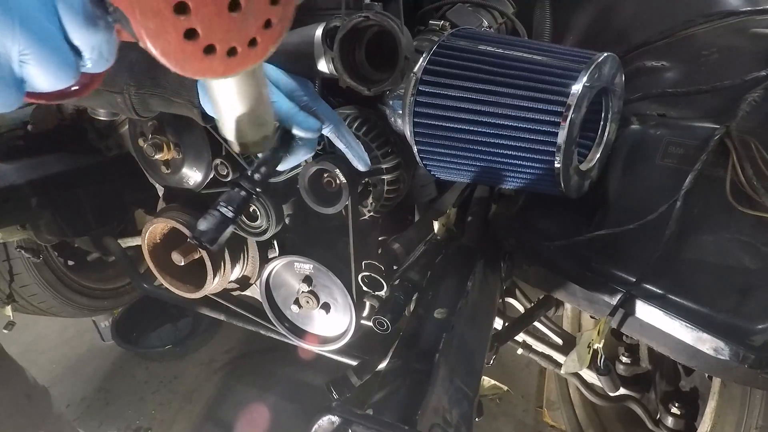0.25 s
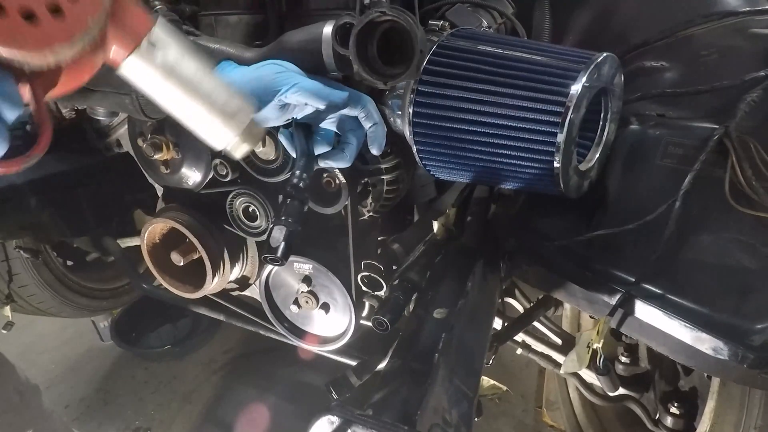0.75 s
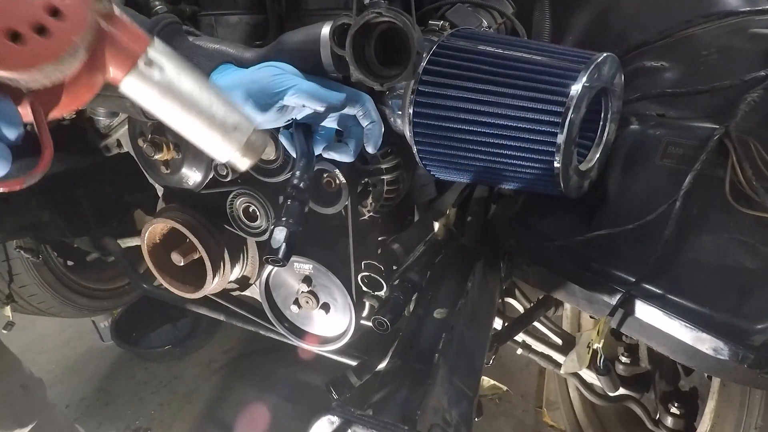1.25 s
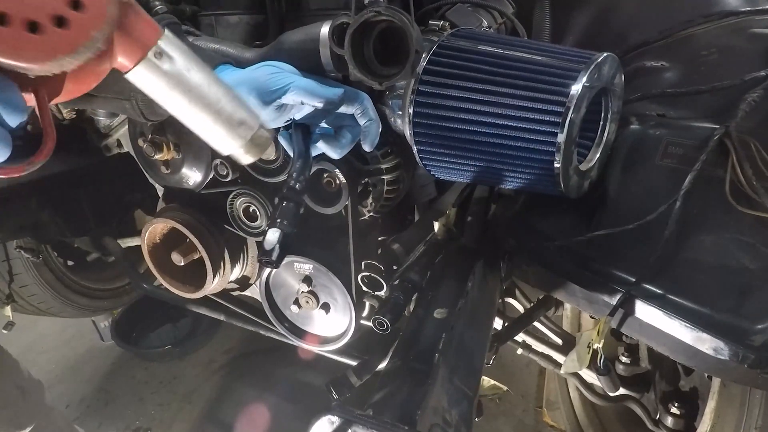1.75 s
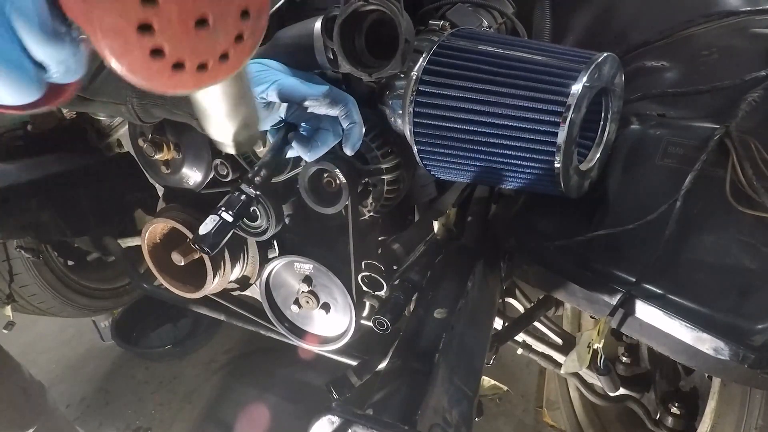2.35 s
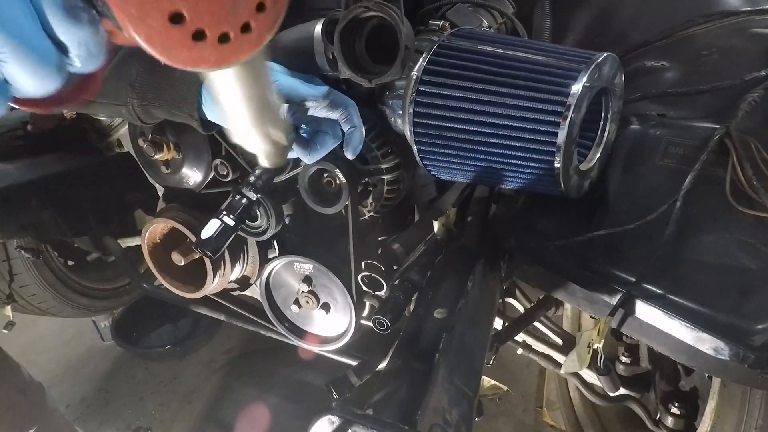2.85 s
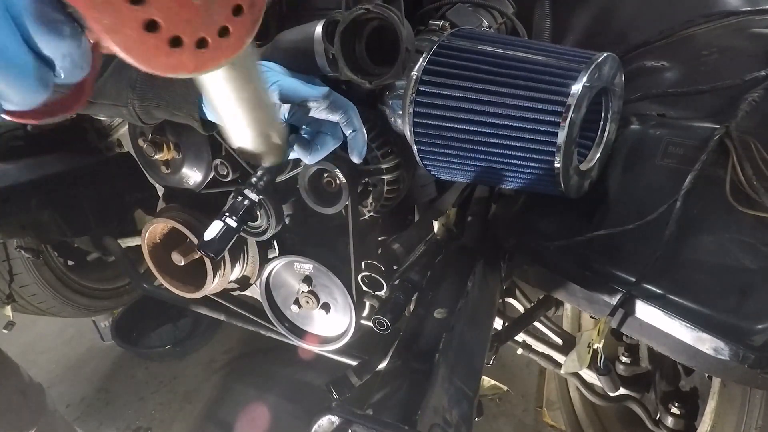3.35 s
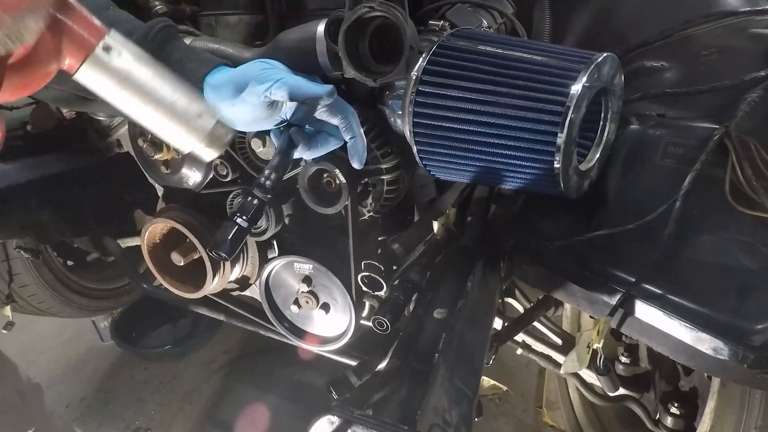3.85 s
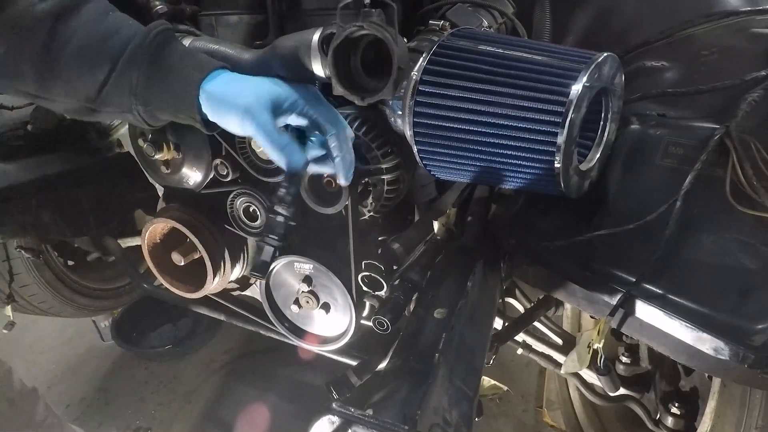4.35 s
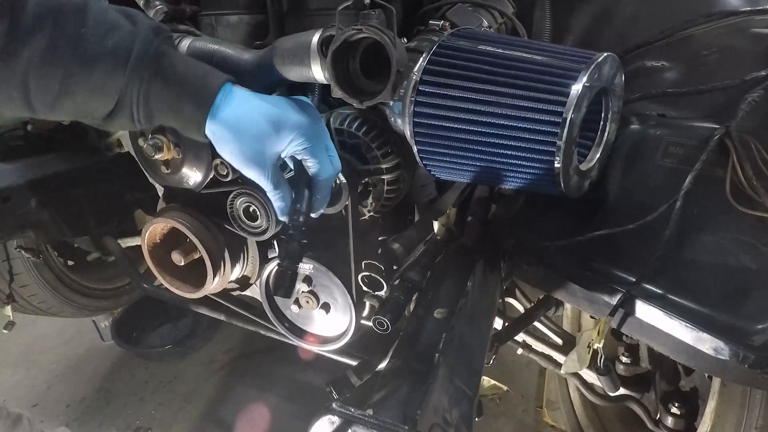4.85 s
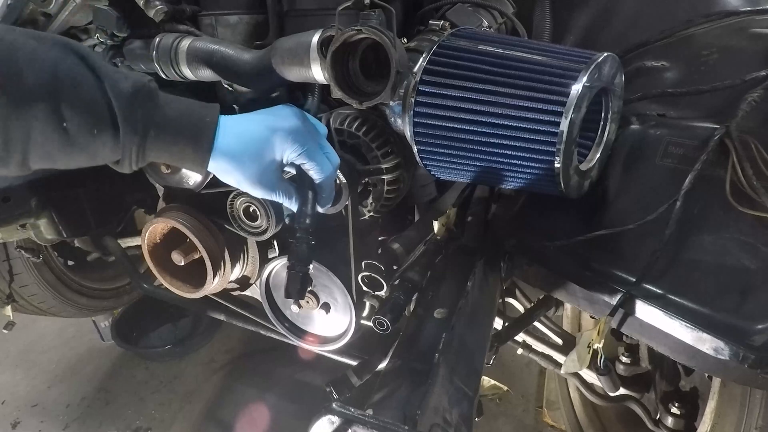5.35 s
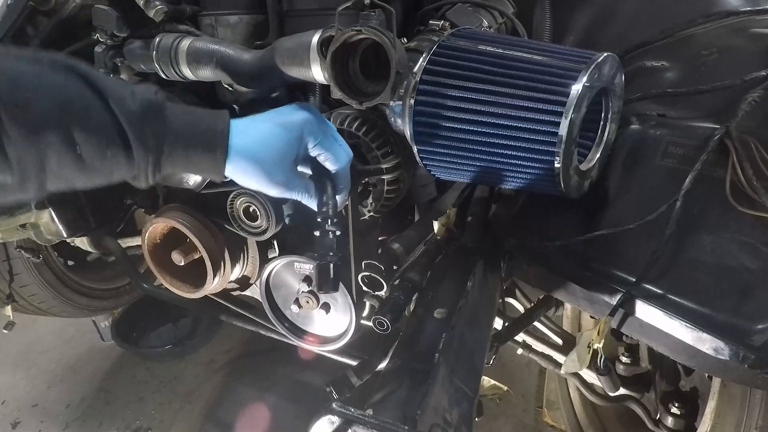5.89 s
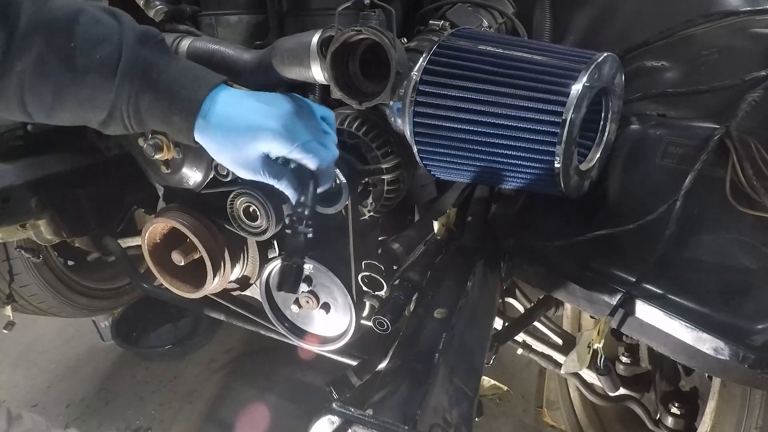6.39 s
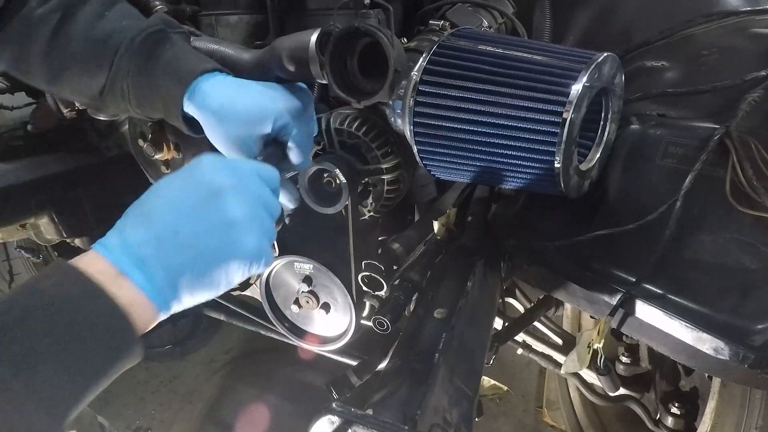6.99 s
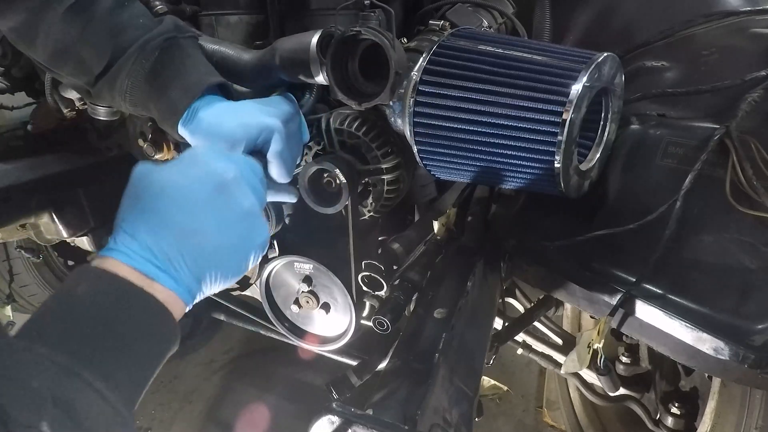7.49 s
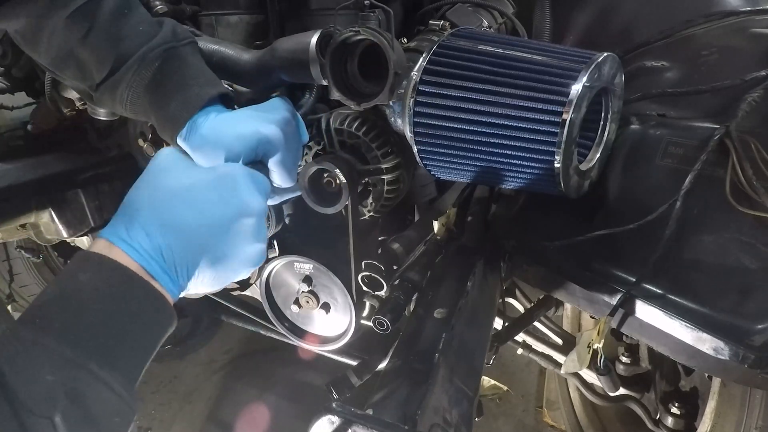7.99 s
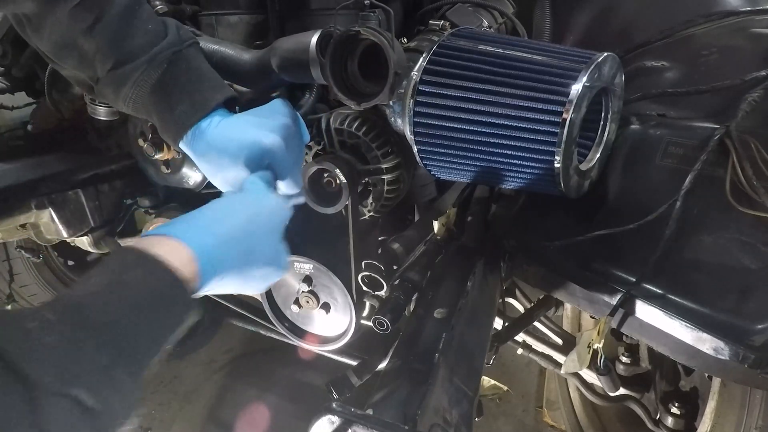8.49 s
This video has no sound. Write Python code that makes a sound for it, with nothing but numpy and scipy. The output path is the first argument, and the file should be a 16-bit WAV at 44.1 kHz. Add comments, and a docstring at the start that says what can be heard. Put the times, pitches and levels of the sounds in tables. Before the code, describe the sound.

A heat gun runs throughout in a garage, at first a hand's width from the microphone: a broad, hollow fan rush over a motor hum around 220 Hz, with low wind rumble. From about 0.75 to 2.0 s its draught batters the microphone in irregular, heavy, overloaded thuds, hardest at the start, choking the hiss. From 2.1 to 3.6 s the rush and hum return, swelling closer. A second, shorter bout of thuds hits at 3.7-3.9 s, with weaker ones to 4.45 s. The gun then swings away, quieter and changing colour, with a small tick near 5.2 s. At 5.8 s the steel nozzle clicks on concrete, and a duller plastic clack follows at 5.87 s, with short metallic chatter and a faint low groan sliding down around 6.1 s. The blower then settles, slightly louder and resonant, with faint, sharp ticks from 6.8 s until the end at about 8.7 s.

```python
"""Heat gun in a garage

A heat gun warms a rubber hose a hand's width from the microphone: coloured noise for the fan rush over a motor hum.
Twice it turns side-on and its draught buffets the microphone in heavy thuds: swells of pressure and low noise.
Then it is swung away and set down with a click and a clack, noise bursts ringing through resonances,
and runs on, ticking faintly on the floor. A low groan slides down after the clack."""
import sys
import numpy as np
from scipy import signal
from scipy.fft import rfft, irfft, next_fast_len
from scipy.io import wavfile
from scipy.ndimage import uniform_filter1d, map_coordinates

SR = 44100
rng = np.random.default_rng(int(sys.argv[2]) if len(sys.argv) > 2 else 0)


def unload_wav(signal):
    """Save mono or channel-first audio to the path in sys.argv[1] as 16-bit WAV at rate SR, clipped to [-1, 1]."""
    wavfile.write(
        sys.argv[1],
        SR,
        np.round(np.clip(np.atleast_2d(signal).T, -1, 1) * 32767).astype(np.int16),
    )


N = 384993
T = np.arange(N) / SR  # time in seconds

# Thuds, each a knot of eddies that hits the microphone.
# Each row: centre in seconds, suction in dB, duration in seconds.
THUD_ROWS = [(.755, -6, 0.012), (.78, 9.5, 0.0098), (0.8, -2.5, 0.0025), (0.816, -0.5, 0.008),
             (.861, -4.5, .009), (0.904, 0, 0.034), (0.946, -5.5, 0.0066), (0.988, 1, .018),
             (1.118, -12.5, 0.0055), (1.142, -10.5, 0.0065), (1.196, -16, 0.0056), (1.234, -4.5, 0.013),
             (1.28, -4.5, 0.021), (1.298, -4.5, 0.0053), (1.35, -1, 0.019), (1.369, -6, 0.0079),
             (1.418, -15.5, .019), (1.462, -16, 0.0066), (1.491, 0, 0.012), (1.518, -11, 0.0079),
             (1.598, -1.5, 0.014), (1.614, -6, 0.004), (1.653, -9.5, 0.0039), (1.682, -7.5, 0.014),
             (1.784, -3.5, 0.014), (1.801, 0, 0.0059), (1.833, -9.5, 0.0059), (1.873, -4, .014),
             (1.911, -1, 0.022), (1.96, -6.5, 0.0038), (2.015, -12, .006), (3.704, -10, 0.023),
             (3.733, 5.5, 0.016), (3.761, -9, 0.0066), (3.782, -2, 0.0026), (3.79, 5, 0.0085),
             (3.832, -0.5, .013), (3.858, -11, 0.0066), (3.873, -6.5, 0.0083), (3.895, -4, 0.0034),
             (4.164, -9.5, 0.0063), (4.31, -2, 0.024), (4.364, -10.5, .011), (4.386, -8, 0.012),
             (4.423, -12, 0.013)]


def gun_held(rush_db=2.5, hiss_db=-20, flicker_db=1.0, hum_side_db=-11.5, hum_beam_db=5.5, beam=4.3):
    """Close by: a broad rush from the intake, more hollow from the side; the hum beams out of the intake."""
    # Gun in the hand. Each row: time in seconds, base level in dB, how squarely the intake faces the mic (0-1).
    pose = [(0, -26, 1), (.75, -27.5, 0.72), (.84, -35.5, 0.54), (1.0, -40.5, 0.2), (1.08, -51, 0),
            (1.33, -48, 0), (1.96, -46.5, 0.02), (2.14, -52.5, 0.6), (2.62, -41, 1), (3.25, -31, 0.92),
            (3.83, -31.5, 0.89), (3.97, -48.5, 0.11), (4.35, -47, 0), (4.55, -54, 0.03)]
    # Colour of the rush from behind. Each row: frequency in Hz, density in dB per Hz.
    intake_colour = [(60, -31), (130, -10), (280, -13), (400, -10), (672, -11), (1300, -13), (1560, -5.5),
                     (1920, -16), (2840, -13), (3340, -21), (4020, -24.5), (8260, -25.5), (15000, -47.5)]
    # Colour of the rush from the side. Each row: frequency in Hz, density in dB per Hz.
    side_colour = [(120, -2.5), (400, -11.5), (700, -6), (1100, -4), (1700, -6.5), (2500, -7.5),
                   (4200, -18.5), (6000, -18.5), (8700, -19), (9800, -25), (15000, -88)]
    # Resonances of the fan housing and barrel. Each row: centre in Hz, width in Hz, lift in dB.
    housing = [(642, 110, 4.5), (1114, 220, 6.5), (1590, 330, 0.5), (2040, 105, 3), (2270, 260, -5.5),
               (2816, 150, 3), (3660, 260, 1.5), (4064, 330, 9.5), (5170, 200, 2), (6380, 370, 5.5),
               (6630, 450, -9), (6940, 220, 1.5), (8380, 230, 5)]
    jet_lift_db = 6.5  # greatest swell of the side-on rush round a thud

    level_db, facing = curve(pose)
    facing = np.clip(facing, 0, 1)
    side_on = 1 - facing
    rush = np.sqrt(facing) * noise(intake_colour, housing) + np.sqrt(side_on) * noise(side_colour, housing)
    rush = drift(rush, share=0.016, rate=3)
    # above the housing's resonances only the hiss of the intake slots is left
    hiss = noise([(7000, -47), (9500, -13.0), (11000, -5.5), (13000, -2), (15000, -11.0)])
    air = cut(rush, 10100, "low", order=6) * undb(rush_db) + hiss * undb(hiss_db)
    air = reflect(air, travel=0.091 * facing, share=0.068)
    jet_db = jet_lift_db * side_on * jet_aim()
    air = air * undb(level_db + jet_db + flicker_db * walk(45))
    return air + hum(level_db + hum_side_db + hum_beam_db * facing ** beam)


def jet_aim(aim_s=0.017):
    """How nearly the nozzle points at the microphone, 0-1: it swings through the aim at each thud."""
    return np.minimum(pulses([(s, db / 2, aim_s) for s, db, _ in THUD_ROWS]), 1)


def gun_away(hum_db=-11.0, flicker_db=0.48, settle_s=0.87):
    """Further off and heard round the car; the colour drifts as it is lowered and settles on the floor."""
    # Colour of the rush while lowered. Each row: frequency in Hz, density in dB per Hz.
    low_colour = [(100, -24), (180, -17.5), (255, -13.5), (310, -17), (480, -18), (620, -12.5),
                  (1150, -11.5), (1500, -13), (2860, -19), (3430, -22), (5690, -22.5), (8500, -28.5),
                  (15000, -36.5)]
    # Colour of the rush while lying. Each row: frequency in Hz, density in dB per Hz.
    floor_colour = [(100, -20.5), (170, -18.5), (230, -9.5), (290, -19), (350, -16), (520, -17.5),
                    (620, -15), (800, -11), (1180, -9), (1500, -13.5), (3430, -21), (5920, -24),
                    (9000, -26.5), (15000, -34.5)]
    # Resonances between gun, floor and car. Each row: centre in Hz, width in Hz, lift in dB.
    under_car = [(619, 48, 8), (735, 32, 5.5), (830, 44, 2.5), (896, 63, -9), (993, 36, 6), (1168, 73, 7),
                 (1375, 29, 7.5), (1620, 25, 2.5), (1970, 19, 7), (2550, 470, 3), (5870, 550, 6)]
    # Gun resonances that face the microphone in passing as it is lowered.
    # Each row: centre in seconds, duration in seconds, frequency in Hz, width in Hz, dB relative to the rush.
    glints = [(4.85, 0.37, 1660, 180, -5), (5.24, 0.1, 1175, 35, -1.5), (5.48, 0.89, 2850, 55, -8),
              (5.24, 1.9, 5750, 910, -10.5)]
    swung_s, lowering_s, landed_s = 4.77, 0.35, 5.7
    # the level swells slowly from 4.77 s, and again from 5.7 s
    swung_db, lowered_db, lying_db = -48.5, -44.5, -40.5

    lowering = ramp(swung_s, lowering_s)
    settling = ramp(landed_s, settle_s)
    level_db = swung_db + (lowered_db - swung_db) * lowering + (lying_db - lowered_db) * settling

    swung = noise(low_colour)
    for s, length, hz, width, db in glints:
        band = cut(rng.standard_normal(N), [hz - width / 2, hz + width / 2], "band", order=1)
        swung = swung + undb(db) * bell(T - s, length) * unit(band)

    lying = drift(noise(floor_colour, under_car), share=0.011, rate=5)
    down = ramp(landed_s, 0.28)
    rush = np.sqrt(1 - down) * swung + np.sqrt(down) * lying
    rush = reflect(rush, travel=0.329 * ramp(4.63, 1.3), share=0.14)
    return rush * undb(level_db + flicker_db * walk(30)) + hum(level_db + hum_db)


def hum(level_db, wobble=0.00599, waver_db=2.3, blur=0.012):
    """The motor's slightly unbalanced fan: a shaft tone with overtones smeared by the air."""
    # Speed of the motor. Each row: time in seconds, shaft rate in Hz.
    shaft = [(0, 224.5), (2.85, 223.7), (3.3, 221.2), (4.5, 227.4), (5.4, 218.1), (7.6, 221.1), (8.73, 220)]
    # Hum and overtones. Each row: multiple of the shaft rate, relative level in dB.
    partials = [(1, 1), (2, -16.5), (3, -19.5), (4, -19), (5, -34)]

    hz = curve(shaft)[0]
    phase = 2 * np.pi * np.cumsum(hz * (1 + wobble * walk(14))) / SR
    smear = 2 * np.pi * np.cumsum(hz * blur * walk(90)) / SR
    stack = np.zeros(N)
    for k, db in partials:
        # the smear cancels in the shaft tone and grows with each overtone
        stack += undb(db + waver_db * walk(12)) * np.sin(k * (phase + smear) - smear)
    return np.sqrt(2) * stack * undb(level_db)


def draught(sway_db=1, flutter_db=-1.5, rough=0.59):
    """Air over the microphone port: gusts sway and flutter, thuds suck raggedly, surges press smoothly."""
    # The draught sweeps over the microphone.
    # Each row: start of the hold in seconds, hold in seconds, sway and flutter in dB before their trims.
    gusts = [(0.025, 0.3, -25.5, -40), (0.396, 0.38, -18, -48), (0.786, 0.24, -26, -19),
             (1.124, 0.21, -29, -31.5), (1.278, 0.28, -22.5, -25.5), (1.6, 0.45, -20.5, -22.5),
             (2.756, 0.035, -25, -61), (2.985, 0.45, -32, -46), (3.49, 0.45, -25.5, -62),
             (3.748, 0.14, -27, -15.5), (4.163, 0.03, -30.5, -40), (4.315, .06, -28.5, -35.5),
             (4.598, .02, -34.5, -64)]
    # Colour of the flutter. Each row: frequency in Hz, density in dB per Hz.
    flutter_colour = [(15, -40), (55, 13.5), (110, 7.5), (200, 0), (350, -8.5), (600, -30), (1500, -57),
                      (5000, -77)]
    # Surges: the jet presses smoothly on the microphone and chokes the hiss.
    # Each row: centre in seconds, pressure in dB, duration in seconds.
    surges = [(.592, -7.5, 0.015), (1.317, -6.5, 0.013), (1.39, -7, 0.016), (1.54, -8.5, .025),
              (1.702, -5.5, 0.021), (1.85, -3.5, .014), (1.934, -4, 0.012), (3.925, -12, 0.02),
              (4.455, -17, 0.028)]
    attack_s, sway_t60_s, flutter_t60_s = 0.065, 0.45, 0.12
    vent_hz, sag_hz, sag_db = 3.45, 0.21, -6.5  # the capsule's recovery: a quick swing back, then a slow sag

    slow = swells([(s, hold, db) for s, hold, db, _ in gusts], attack_s, sway_t60_s)
    fast = swells([(s, hold, db) for s, hold, _, db in gusts], attack_s, flutter_t60_s)
    sway = noise([(8, -2.5), (20, 5.5), (35, -12.0), (60, -15.5), (150, -73), (600, -75)])
    sway = sway * slow * undb(sway_db)
    flutter = noise(flutter_colour) * fast * undb(flutter_db)
    suction = thuds()
    surge = pulses(surges)

    # strong eddies in a fluttering gust break up most
    grain = noise([(60, 1.5), (190, 3.5), (340, -2.5), (600, -19), (1500, -22.5), (5000, -45.5)])
    ragged = 1 + rough * np.sqrt(suction * fast) * grain
    # a passing gust sweeps the small turbulence aside
    swept = 1 + 3 * uniform_filter1d(suction, size=SR // 50) + 10 * surge
    turbulence = (sway + flutter) / swept

    # the capsule's vent lets the pressure swing back after each gust
    pressure = cut(surge - suction * ragged, vent_hz, "high", order=1)
    # a slow, smooth sag outlasts the buffeting
    sag = cut(cut(suction, sag_hz, "low", order=1), sag_hz, "low", order=1)
    return turbulence + pressure - undb(sag_db) * sag


def thuds(breakup_db=-4.5, eddy_hz=103, eddy_jitter=0.16, eddy_depth=0.5):
    """Each thud is a swell of suction, strongest in the middle; long, strong ones break up into eddies."""
    out = np.zeros(N)
    for (s, db, length), chance in zip(THUD_ROWS, rng.standard_normal(len(THUD_ROWS))):
        t = np.arange(-2 * length, 2 * length, 1 / SR)
        depth = eddy_depth * undb(min(db - breakup_db, 0)) ** 2  # weaker thuds stay smoother
        rate = eddy_hz * np.exp(eddy_jitter * chance)
        eddies = 1 - depth * np.sin(np.pi * rate * t) ** 2
        add(out, s + t[0], undb(db) * bell(t, length) * eddies)
    return out


def knocks(tick_db=-3, ring_db=-1.0, scrape_db=-3):
    """Steel nozzle and plastic body knock on the concrete; the loose nozzle chatters and ticks."""
    # The gun meets the floor, nozzle first, and rocks once.
    # Each row: time in seconds, steel nozzle in dB, plastic body in dB.
    floor_knocks = [(5.801, -24, -33.5), (5.8696, -29, -18.5), (6.087, -43, -50)]
    # The nozzle ticks. Each row: time in seconds, level in dB before the trim.
    ticks = [(5.186, -31.5), (5.4415, -44), (6.768, -36), (6.8336, -38), (6.8934, -38), (7.2744, -37),
             (7.3906, -37.5), (7.658, -40), (7.776, -37), (7.9274, -39), (8.0426, -37), (8.308, -37),
             (8.425, -37), (8.542, -39), (8.6949, -35.5)]
    # Resonances of the steel nozzle. Each row: centre in Hz, width in Hz, lift in dB.
    nozzle = [(4500, 260, 6), (6080, 130, 7), (6450, 140, 16), (7400, 220, 11), (8130, 240, 11),
              (9020, 330, 16), (10330, 300, 12), (10980, 260, 10), (11900, 330, 9), (13100, 260, 7),
              (13780, 380, 13)]
    # Resonances of the plastic body. Each row: centre in Hz, width in Hz, lift in dB.
    body = [(668, 35, 1), (770, 43, 6), (935, 90, 6), (1130, 70, -5), (1430, 140, -10), (1990, 100, 8),
            (2460, 110, 6), (3270, 110, 15), (4200, 82, 10)]
    # Crack of the steel. Each row: frequency in Hz, density in dB per Hz.
    steel_crack = [(300, -20), (1500, 4), (3000, 2.5), (4600, 5), (7000, -1), (10000, -5.5), (15000, -7)]
    # Crack of the body. Each row: frequency in Hz, density in dB per Hz.
    body_crack = [(100, -17), (300, -9), (700, 3), (1300, 1), (2300, -1), (3300, -12), (8000, -9),
                  (15000, -22)]
    chatter_s, chatter_hold_s, chatter_t60_s, chatter_db = 5.95, 0.24, 0.25, -47

    out = np.zeros(N)
    for s, steel_db, body_db in floor_knocks:
        click = strike(nozzle, steel_crack, crack_t60=0.081, ring_t60=0.33, ring_db=-2.0)
        clack = strike(body, body_crack, crack_t60=0.16, ring_t60=0.33, ring_db=-4.5)
        add(out, s, undb(steel_db) * click)
        add(out, s, undb(body_db) * clack)
    for s, db in ticks:
        tick = strike(nozzle, steel_crack, crack_t60=0.041, ring_t60=0.095, ring_db=-5.5)
        add(out, s, undb(db + tick_db) * cut(tick, 6200, "high"))

    # the nozzle chatters on the concrete until it settles
    chatter = swells([(chatter_s, chatter_hold_s, chatter_db)], attack=0.04, t60=chatter_t60_s)
    chatter = chatter * undb(2.2 * walk(70))
    ring = undb(ring_db) * noise(steel_crack, nozzle)
    scrape = undb(scrape_db) * noise(steel_crack)
    return out + (ring + scrape) * chatter


def strike(modes, crack, crack_t60, ring_t60, ring_db, snap_t60=0.022, size=SR // 2):
    """One blow: a hard snap of contact, a short broad crack, then the struck part's resonances ring on."""
    t = np.arange(size) / SR
    ring = noise(crack, modes, size=size) * fade(t, ring_t60)
    snap = cut(noise(crack, size=size), 5000, "low") * fade(t, snap_t60)
    burst = noise(crack, size=size) * fade(t, crack_t60)
    return snap + burst + undb(ring_db) * ring


def groan(wobble=0.027, waver_db=2):
    """A faint, wavering low tone that slides down as the gun settles after the clack."""
    centre_s, length_s, centre_hz, octaves_per_s, level_db = 6.12, 0.22, 145, -1.3, -54
    hz = centre_hz * 2 ** (octaves_per_s * np.clip(T - centre_s, -1, 1))
    phase = 2 * np.pi * np.cumsum(hz * (1 + wobble * walk(60))) / SR
    return np.sqrt(2) * np.sin(phase) * bell(T - centre_s, length_s) * undb(level_db + waver_db * walk(36))


def garage(x, wet_db=-11, t60=1.0, size=SR):
    """The diffuse tail of the garage: the sound convolved with decaying, coloured noise."""
    t = np.arange(size) / SR
    tail = noise([(120, 8.0), (900, 3.5), (4500, 4.0), (9000, -3), (15000, -1)], size=size)
    tail = tail * fade(t, t60) * np.minimum(t / 0.022, 1)
    tail = tail / np.sqrt(np.sum(tail ** 2))
    return x + undb(wet_db) * signal.fftconvolve(x, tail)[:N]


def slow_drift(level_db=-40.5):
    """A slow pressure drift: noise with nearly all its energy below hearing."""
    colour = [(1.5, 11.0), (18, -81), (30, -28), (80, -38), (160, -61.0), (600, -59), (4000, -90)]
    return undb(level_db) * noise(colour)


def reflect(x, travel, share=.2, count=7):
    """Echoes off nearby panels comb the sound; each path changes as the gun travels (m)."""
    paths = rng.uniform([.4, -1], [3.5, 1], (count, 2))  # extra path in metres, change per metre of travel
    echoes = sum(np.interp(T - (metres + slope * travel) / 343, T, x) for metres, slope in paths)
    return (x + share * echoes) / np.sqrt(1 + count * share ** 2)


def drift(x, share, rate):
    """Lets every resonance of a sound wander in pitch by a small share, by varying the reading speed."""
    return map_coordinates(x, [np.cumsum(1 + share * walk(rate))], mode="mirror")


def noise(points, resonances=(), size=N):
    """Noise of rms 1 with a smooth colour, lifted or dipped at each resonance."""
    n = next_fast_len(size)
    f = np.arange(n // 2 + 1) * SR / n + 1e-3
    hz, db = np.transpose(points)
    shape = np.interp(np.log(f), np.log(hz), db)
    for centre, width, lift in resonances:
        shape = shape + lift / (1 + (2 * (f - centre) / width) ** 2)
    gain = undb(shape) / np.hypot(1, (hz[0] / f / 2) ** 2)  # rolls off below the first point
    return unit(irfft(rfft(rng.standard_normal(n)) * gain, n)[:size])


def walk(rate):
    """Random levels held 1 / rate s and slewed twice; spread near 1."""
    k = int(SR / rate)
    steps = np.repeat(rng.standard_normal(N // k + 1), k)
    return 1.3 * uniform_filter1d(uniform_filter1d(steps, k), k)[:N]


def swells(rows, attack, t60):
    """For each (s, hold s, dB): rises to its level by s, holds, then dies away."""
    out = np.zeros(N)
    for s, hold, db in rows:
        t = np.arange(-min(attack, s), hold + t60, 1 / SR)
        rise = np.minimum(1 + t / attack, 1) ** 2
        add(out, s + t[0], undb(db) * rise * fade(np.maximum(t - hold, 0), t60))
    return out


def pulses(rows):
    """A bell-shaped pressure pulse for each (s, dB, duration s)."""
    out = np.zeros(N)
    for s, db, length in rows:
        t = np.arange(-2 * length, 2 * length, 1 / SR)
        add(out, s - 2 * length, undb(db) * bell(t, length))
    return out


def bell(t, length):
    """A swell of height 1 that stays above one half for this length."""
    return .5 ** ((2 * t / length) ** 2)


def fade(t, t60):
    """Exponential decay by 60 dB in t60 seconds."""
    return np.exp(-np.log(1000) * t / t60)


def ramp(start, length):
    """From 0 to 1 over a stretch of time."""
    return np.clip((T - start) / length, 0, 1)


def curve(rows):
    """Every column of a table after its times, as a signal."""
    s, *columns = np.transpose(rows)
    return [np.interp(T, s, c) for c in columns]


def cut(x, hz, kind, order=2):
    """Butterworth filter."""
    return signal.sosfilt(signal.butter(order, hz, kind, fs=SR, output="sos"), x)


def add(out, s, sound):
    """Mix a sound in at time s."""
    i = int(s * SR)
    out[i:i + len(sound)] += sound[:N - i]


def undb(db):
    """Decibels to gain."""
    return 10 ** (np.asarray(db) / 20)


def unit(x):
    """Scale to rms 1."""
    return x / np.sqrt(np.mean(x ** 2))


def scene():
    """The gun near and then away with its hum, its draught, knocks and groan, and a slow pressure drift."""
    away = ramp(4.44, 0.4)
    gun = np.sqrt(1 - away) * gun_held() + np.sqrt(away) * gun_away()
    return (gun + draught() + garage(knocks()) + groan() + slow_drift())[None]


def record(dry, push_limit=0.47, pull_limit=0.94, top_hz=15200):
    """The microphone overloads sooner on push than on pull, so gusts choke the hiss; the top is cut."""
    limit = np.where(dry > 0, push_limit, pull_limit)
    overloaded = limit * np.tanh(dry / limit)
    return signal.sosfilt(signal.ellip(8, .2, 70, top_hz, fs=SR, output="sos"), overloaded)


dry = scene()
out = record(dry)
unload_wav(out)
```